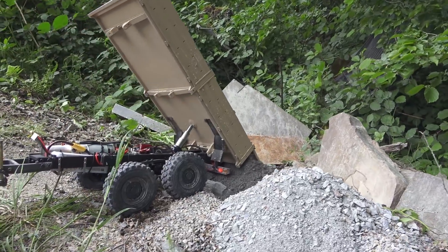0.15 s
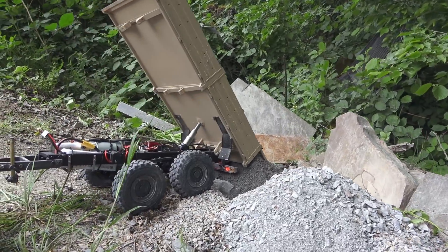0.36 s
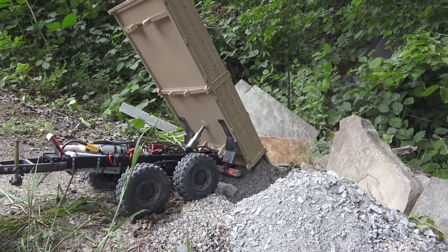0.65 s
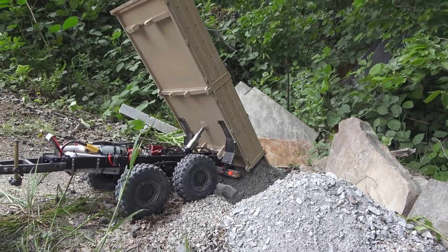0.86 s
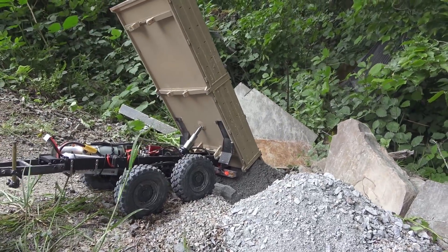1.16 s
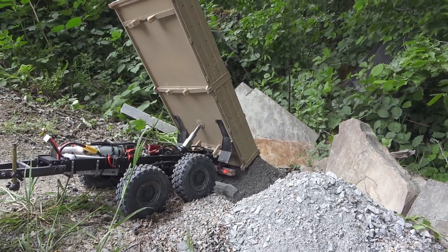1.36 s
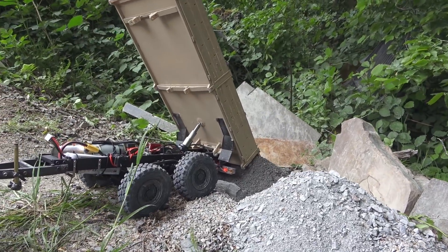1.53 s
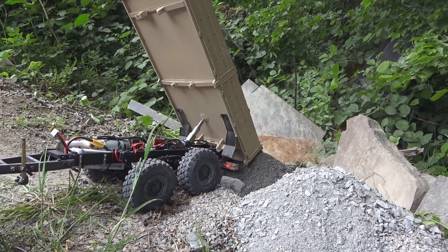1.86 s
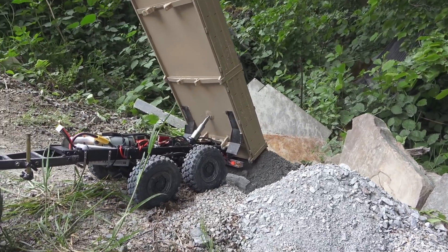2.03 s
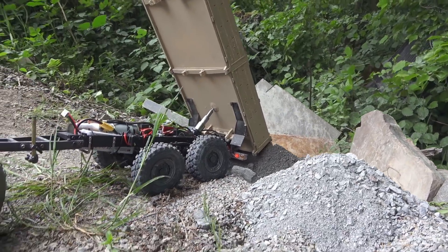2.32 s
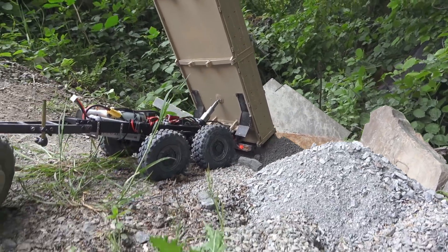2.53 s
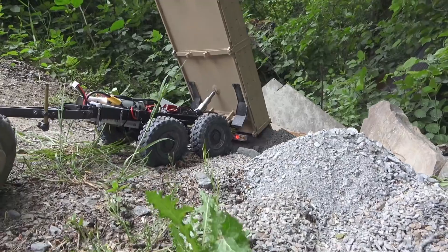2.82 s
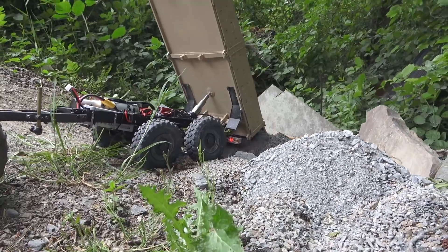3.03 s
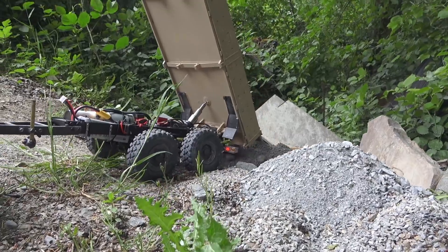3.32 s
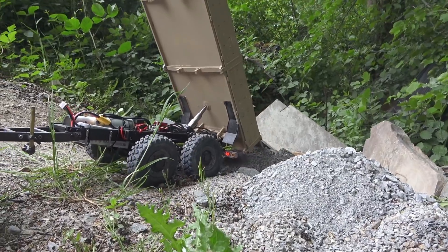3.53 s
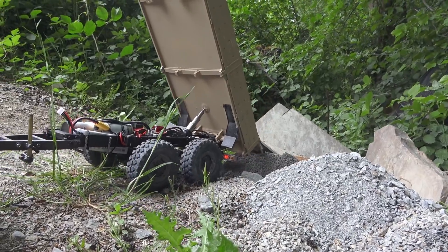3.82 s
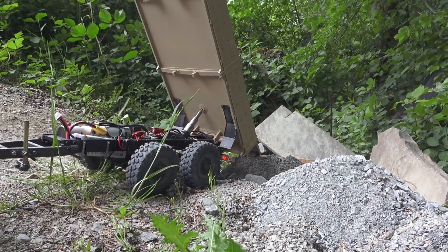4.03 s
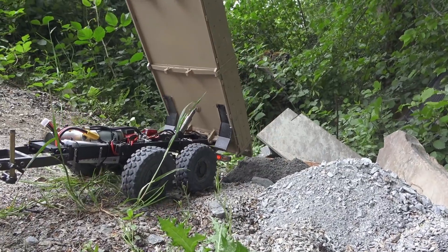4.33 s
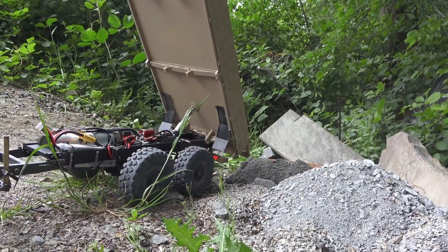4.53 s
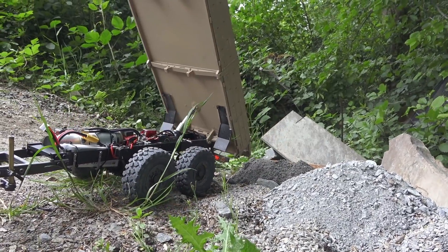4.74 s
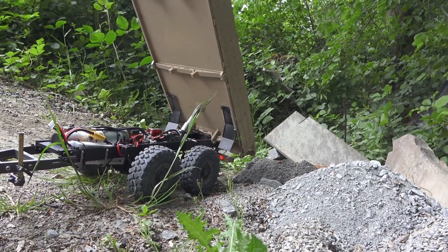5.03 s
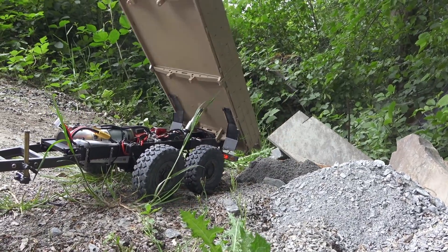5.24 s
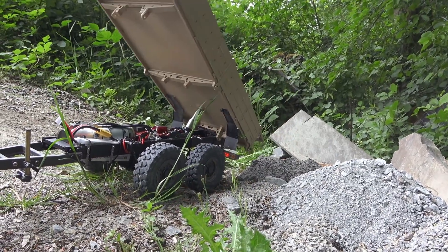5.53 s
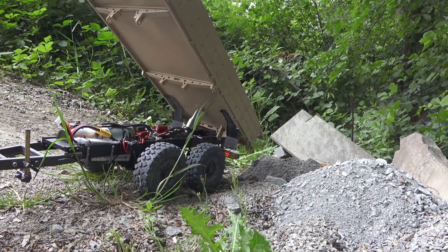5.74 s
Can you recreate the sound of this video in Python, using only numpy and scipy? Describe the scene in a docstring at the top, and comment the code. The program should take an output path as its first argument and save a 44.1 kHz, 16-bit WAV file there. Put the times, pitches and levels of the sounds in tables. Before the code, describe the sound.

Stereo microphone close by, source mainly left: hollow, grinding drivetrain noise with a fast flutter, loudest from about one to four seconds, with small stone jolts and a brief rising hum early on. Bright grit scuffs around four seconds. Then it quiets to an unsteady low moan, steady high motor singing and hiss, two servo whirrs and one clear tick. A very faint low drone lies far off.

```python
"""A model truck pulls its tipped trailer over gravel, close on the left of a stereo microphone: friction noise
of gears and tyres drives the frame's resonances, which shift with its bearing and jolt over stones. Sine tones
hum in the drawbar and moan in the chassis; band-passed noise scuffs through grit on the last pull. The pump
motor sings thin high shaft orders, nearly straight ahead, over a wide hiss; a valve servo zips twice as its
orders cross its case's modes. Noise cracks tick in the linkage; a low drone lies far off."""
import sys
import numpy as np
from scipy import signal
from scipy.fft import rfft, irfft, next_fast_len
from scipy.io import wavfile
from scipy.ndimage import uniform_filter1d, map_coordinates

SR = 44100
rng = np.random.default_rng(int(sys.argv[2]) if len(sys.argv) > 2 else 0)


def digitize_waveform(pressure):
    """Quantize a signal to 16-bit integers and store it at the path in sys.argv[1].

    Rows of a 2-D input are taken as channels; values are limited to [-1, 1].
    """
    field = np.atleast_2d(pressure).T
    bounded = np.clip(field, -1, 1)
    quanta = np.round(bounded * 32767).astype(np.int16)
    wavfile.write(sys.argv[1], SR, quanta)


N = 259300

# effort of the drive: time_s, relative level_db, middle modes over the low ones_db
EFFORT = [(0, -25, -7), (.4, -23, -8.5), (.45, -21, -10), (.55, -25, -8.5), (1.04, -19.5, -9),
          (1.15, -16, -8.5), (1.4, -16.5, -8), (1.55, -18.5, -8), (1.64, -24.5, -7.5), (1.78, -21.5, -9),
          (1.88, -27.5, -10.5), (2.04, -19, -10.5), (2.44, -19, -6), (2.55, -24.5, -3), (2.88, -17.5, -5.5),
          (3.1, -20.5, -4.5), (3.6, -25.5, -3), (3.75, -20.5, -3.5), (3.93, -20.5, -6), (4.33, -20.5, -8),
          (4.46, -25, -6.5), (4.91, -29, -6), (5.1, -28.5, -7), (5.28, -24, -8), (5.42, -27.5, -8),
          (5.5, -24, -7.5), (5.63, -28, -5), (5.72, -24.5, -6), (5.88, -27.5, -9.5)]
# the drive gear's beat: time_s, turns_per_s
GEAR_BEAT = [(0, 18.5), (.9, 19), (1.2, 24), (2.4, 24), (2.8, 19.2), (4.4, 19.2), (5, 17.5), (5.88, 17.5)]
# the truck swings to a new bearing four times: start_s and end_s in turn
SWINGS_S = [1.03, 1.13, 1.6, 2.0, 2.4, 2.75, 4.2, 4.6]
# load on the drawbar: time_s, pitch shift_hz, hum level_db (before panning)
DRAWBAR = [(0, 0, -42), (.4, -8, -37), (.85, -5, -36), (.92, 8, -27), (1.1, 30, -25), (1.22, 42, -28),
           (1.35, 0, -50), (2, -10, -50), (2.3, 30, -50), (5.88, 0, -60)]


def amp(db):
    """dB to gain."""
    return 10 ** (np.asarray(db) / 20)


def unit(x):
    """Scaled to rms 1."""
    return x / np.sqrt(np.mean(x ** 2) + 1e-20)


def along(points, hz):
    """(Hz, value) points read on a log frequency axis."""
    f, v = np.transpose(points)
    return np.interp(np.log(hz + 1), np.log(f + 1), v)


def curves(rows):
    """One value per sample for each column after the time."""
    s, *cols = np.transpose(rows)
    return [np.interp(np.arange(N) / SR, s, c) for c in cols]


def wobble(rate):
    """A smooth random curve, rate knots a second."""
    knots = rng.standard_normal(int(N * rate / SR) + 4)
    return map_coordinates(knots, [np.arange(N) * rate / SR])


def filtered(x, response):
    """x times a complex response of frequency."""
    m = next_fast_len(N + 8192)
    return irfft(rfft(x, m) * response(np.fft.rfftfreq(m, 1 / SR)), m)[..., :N]


def resonance(hz, centre_hz, width_hz):
    """One mode's complex response, 1 at its centre."""
    return 1j * hz * width_hz / (centre_hz ** 2 - hz ** 2 + 1j * hz * width_hz)


def throb(hz, depth_db, wander):
    """Gain of a regular swell at an unsteady rate."""
    return amp(depth_db * np.sin(2 * np.pi * np.cumsum(hz * (1 + wander * wobble(2.987))) / SR))


def frame():
    """Throbbing, lumpy friction noise drives frame modes whose strengths change with the bearing."""
    # frame modes: centre_hz, width_hz (before widening), relative level_db at each of five bearings,
    # right over left_db at the first three bearings, at the fourth and at the fifth
    modes = [(142, 38.5, -18, -12.5, -15, -12.5, -18.5, -7, -8.5, -10.5),
             (187.7, 47.6, -14.5, -8.5, -9.5, -5, -16, -17.5, -18.5, -34),
             (278.3, 56, -14.5, -7, -8.5, -4, -12.5, -15, -15.5, -28),
             (370.8, 40.4, -5, -6.5, -5.5, 1, -3.5, -25.5, -29, -23),
             (416, 40, -37, -9, -12, 0.5, -14.5, -22, -21.5, -13),
             (518.3, 39.8, 0, 2.5, -0.5, -38, -20.5, -23, -19, -8),
             (604, 46, -15, -2, -0.5, -10, -17.5, -24, -30, -15),
             (672.3, 50.8, -3.5, 3, 1.5, 2.5, -6, -14.5, -20, -43),
             (744, 34.3, -7.5, -0.5, 0.5, -10, -14, -21, -29, -37),
             (828, 164, -23.5, -16, -18.5, -17.5, -25, -14, -26, -31),
             (1087.5, 90, -7, -7, -5, -6, -2, -14.5, -10.5, -25),
             (1304, 98, -1.5, -4.5, -2, -1.5, -6, -16.5, -19.5, -19),
             (1464, 126, -8.5, -6, -4, 0.5, -45, -31, -41, -20),
             (1642, 102, -12.5, -12, -13, -7.5, -5, -34, -26, -31),
             (1795, 53, -26, -11, -45, 1.5, -2.5, -31, -28, -27),
             (1957, 120, -11.5, -8, -7, -22, -28, -31, -9.5, -9),
             (2362, 150, -30, -24.5, -23.5, -34, -23, -15, -8, -10),
             (2544, 85, -54, -43, -46, -24.5, -27.5, -14, -31, -17),
             (3058, 262, -24.5, -25.5, -27, -20, -25.5, -23, -22.5, -22),
             (3370, 430, -44, -54, -33, -47, -24.5, -16, -17, -24),
             (3784, 224, -32, -28.5, -29, -22, -34, -20, -21, -3),
             (4130, 190, -51, -36, -26, -44, -26.5, -33, -26, -23),
             (4740, 570, -39, -36, -34.5, -32, -30, -37, -34, -27),
             (5900, 530, -53, -47.5, -51, -46, -36, -24, -18, -22)]
    # likeness of the two capsules: frequency_hz, correlation
    likeness = [(60, .99), (200, .99), (380, .9), (640, .99), (1400, .98), (3100, .88)]
    # phase of the left capsule ahead of the right (behind it where negative): frequency_hz, phase_rad
    phase_offset = [(60, -0.5), (1400, 0.66), (1640, -3), (1980, -5.5), (2840, -6.4), (3530, -11.5)]
    # loose parts: time_s, level of the upper modes_db, independent of the effort
    loose_parts = [(0.0, -41), (0.06, -49), (0.08, -42.5), (0.77, -42), (1.46, -35.5), (1.7, -46.5),
                   (1.72, -40.5), (1.83, -48.5), (2.18, -38), (2.46, -38.5), (2.52, -44), (2.85, -37.5),
                   (2.86, -39.5), (3.26, -41), (3.65, -43.5), (3.78, -40.5), (4.31, -41.5), (4.34, -44.5),
                   (4.95, -50), (5.01, -44.5), (5.29, -47), (5.53, -43.5), (5.86, -46.5), (5.88, -42)]

    t = np.arange(N) / SR
    gear, = curves(GEAR_BEAT)
    beat = throb(2 * gear, 0.27, 0.032) * throb(gear, 1.18, 0.0406) * amp(0.46 * wobble(15))
    drive = unit(beat * amp(1.0 * wobble(150) + jolts()))

    def swung(*db):
        """Gain that moves from bearing to bearing."""
        return amp(np.interp(t, SWINGS_S, np.repeat(db, 2)[1:-1]))

    groups = np.zeros((3, 2, N))  # low, middle and upper modes
    power = np.zeros((3, N))
    for centre_hz, width_hz, *db, early, between, late in modes:
        gain = swung(*db) * np.sqrt(width_hz)  # a wide mode carries more power
        lumpy = drive * amp(0.85 * wobble(15) + 0.95 * wobble(90))
        shared, stray = lumpy * rng.standard_normal((2, N))

        def paths(f):
            """Left, right and stray: the right hears the mode shifted in phase and a little blurred."""
            like = np.clip(along(likeness, f), 0, 1)
            shifted = np.exp(-1j * along(phase_offset, f))
            skirts = resonance(f, centre_hz, 1.885 * width_hz) ** 2  # steep, so the valleys stay dark
            return skirts * [np.ones_like(f), like * shifted, np.sqrt(1 - like ** 2)]

        left, right, blur = filtered([shared, shared, stray], paths)
        if 470 < centre_hz < 560:  # the drawbar's mode shifts with the load
            bend = np.exp(2j * np.pi * np.cumsum(curves(DRAWBAR)[0]) / SR)
            analytic = signal.hilbert([left, right, blur], next_fast_len(N))[:, :N]
            left, right, blur = np.real(analytic * bend)
        right = swung(early, early, early, between, late) * (right + blur)
        g = int(centre_hz > 900) + int(centre_hz > 2200)
        groups[g] += gain * np.array([left, right]) / np.std(left)
        power[g] += gain ** 2

    # loose parts rattle hardest on the beat
    groups[2] *= unit(beat ** .9 * throb(gear, 1.2, .015) * amp(.7 * jolts()))
    level, middle = curves(EFFORT)
    upper = curves(loose_parts)[0] - level  # cancels the effort added below
    # stones under the tyres make each group's level uneven
    lumps = [0.37 * wobble(13), middle + 0.63 * wobble(13), upper + 0.11 * wobble(12)]
    sound = sum(1.75 * amp(level + db) * x / np.sqrt(p) for db, x, p in zip(lumps, groups, power))
    return filtered(notched(sound), lambda f: f ** 2 / (f ** 2 + 60 ** 2))  # low cut


def jolts():
    """A tyre drops off a stone: dB added to the drive as a sudden rise and a short decay."""
    # drops: time_s, rise_db
    drops = [(.078, 4), (.468, 4), (.613, 3), (1.215, 3), (1.925, 4), (2.172, 5), (2.751, 6), (2.795, 4),
             (3.037, 4), (3.078, 5), (3.218, 4.5), (3.261, 3), (3.855, 5), (3.903, 3), (4.22, 3),
             (4.483, 5)]
    decay_s = .016  # the rise in dB falls by 1/e
    t = np.arange(N) / SR
    return sum(db * np.exp(-np.maximum(t - s, 0) / decay_s) * (t >= s) for s, db in drops)


def notched(x):
    """Sliding notches where the ground's echo cancels the frame as the truck rolls."""
    # one curve for each gap: time_s, centre_hz, width_hz
    gaps = [
        [(0, 2660, 220), (1.05, 2660, 200), (1.4, 2720, 30), (2.7, 2770, 40), (3.1, 2950, 70), (4.3, 2870, 70),
         (4.9, 2850, 100), (5.88, 2800, 100)],
        [(0, 3550, 60), (1.2, 3470, 120), (1.7, 3450, 120), (2.1, 3500, 50), (3.2, 3500, 50), (3.7, 3450, 90),
         (4.5, 3680, 70), (5.88, 3650, 60)],
        [(0, 4000, 90), (1.1, 4150, 90), (1.9, 4320, 70), (2.45, 4450, 70), (2.55, 3970, 100), (2.8, 4300, 130),
         (3.6, 4430, 130), (3.8, 4200, 40), (5.88, 4160, 70)],
    ]
    hz, t, z = signal.stft(x, SR, nperseg=1024)
    for rows in gaps:
        s, centre, width = np.transpose(rows)
        band = resonance(hz[:, None], np.interp(t, s, centre), np.interp(t, s, width))
        z = z * np.abs(1 - .93 * band)
    return signal.istft(z, SR, nperseg=1024)[1][:, :N]


def hum():
    """A slightly unsteady sine in the drawbar's mode, which shifts in pitch and level with the load."""
    rest_hz = 515
    shift, db = curves(DRAWBAR)
    tone = np.sin(2 * np.pi * np.cumsum(rest_hz + shift + 11 * wobble(35)) / SR)
    return np.sqrt(2) * amp(db + 3.5 * wobble(25)) * tone * amp([[5], [-15]])


def moan():
    """A narrow low tone as the chassis settles, fading in as the truck slows."""
    # settling tone: time_s, pitch_hz, level_db (before panning)
    settling = [(4.4, 415.1, -32), (4.448, 423, -32), (4.486, 360.0, -38), (4.564, 401.7, -29.5),
                (5.034, 364.9, -32.5), (5.086, 385.7, -30), (5.382, 365.7, -27), (5.428, 347.6, -38),
                (5.498, 377.3, -27), (5.668, 388.6, -31), (5.762, 356, -24.5), (5.88, 394, -32.5)]
    hz, db = curves(settling)
    fade = np.clip((np.arange(N) / SR - settling[0][0]) / .12, 0, 1)
    tone = np.sin(2 * np.pi * np.cumsum(hz + 13 * wobble(30)) / SR)
    return np.sqrt(2) * fade * amp(db + 2.5 * wobble(22)) * tone * amp([[3], [-19]])


def scuff():
    """Tyres scuff through loose grit: bright, grainy band-passed noise on the left, pulsing with the gear."""
    # the last pull: start_s, end_s, fade_s, level_db (before pulsing and panning)
    last_pull = (3.8, 4.32, .07, -50)
    start, end, fade, db = last_pull
    gate = np.interp(np.arange(N) / SR, [start - fade, start, end, end + fade], [0, 1, 1, 0])
    grains = amp(2.3 * wobble(120)) * rng.standard_normal(N)
    grit = unit(filtered(grains, lambda f: resonance(f, 4800, 1700) ** 2))
    pulse = throb(2 * curves(GEAR_BEAT)[0], 1.5, .03) * amp(.7 * wobble(14))
    return amp(db) * pulse * gate * grit * amp([[5], [-11]])


def pump():
    """Shaft orders of the motor, each wavering a little on its own, over a hiss that swells with the effort."""
    # the motor, faster while the valve unloads it: time_s, turns_per_s
    shaft = [(0, 104.38), (.12, 104), (.2, 103), (.39, 102.75), (.42, 100.7), (.55, 100.45), (1.07, 100.72),
             (1.25, 100.3), (1.7, 100.34), (1.95, 100.84), (2.18, 100.56), (2.32, 99.96), (2.74, 100.28),
             (3.97, 100.3), (4.97, 100.48), (5.09, 100.8), (5.11, 103.24), (5.25, 102.7), (5.48, 102.8),
             (5.57, 101.84), (5.7, 101.42), (5.9, 101.44)]
    # lines crowding round multiples of 12 slots: multiple of the shaft, level in its group_db
    orders = [(47, -12), (48, -1), (49, -15), (52, -16), (59, -11), (60, -7), (61, -15), (62, -15),
              (64, -16), (71, -11), (72, -5), (73, -11), (74, -15), (81, -15), (83, -3), (84, -4),
              (85, -11), (86, -10), (87, -18), (95, -8), (96, -3), (97, -10), (98, -13), (99, -18),
              (105, -17), (106, -21), (107, -7), (108, -10), (109, -17), (110, -13), (111, -17), (114, -21),
              (119, -10), (120, -9), (121, -11), (122, -13), (123, -19), (129, -21), (130, -20), (131, -10),
              (132, -13), (133, -16), (134, -15), (135, -19), (142, -22), (143, -11), (144, -14),
              (145, -12), (146, -14), (147, -18), (148, -23), (153, -22), (154, -17), (155, -10),
              (156, -19)]
    # groups of lines: multiple of the slot rate, level before and after the last swing_db
    slot_groups = [(4, -60.5, -70), (5, -79, -59), (6, -67, -58.5), (7, -65, -63.5), (8, -57.5, -62),
                   (9, -55.5, -66), (10, -54, -69), (11, -59, -67), (12, -57, -70), (13, -55, -68)]
    # a group grows or fades for a while, under its multiple of the slot rate: time_s, change_db, half length_s
    swells = {4: [(.75, 6, 0.39), (2.35, -5, .2), (3.7, -5, .8), (5.8, 8, .25)], 5: [(5.7, 6, .33)],
              6: [(1.9, 8, .3), (4.3, 4, 0.23), (5.7, 3.5, .2)], 7: [(3.3, -12, .7), (4.55, 7, 0.33)],
              8: [(.6, -4, .22), (1.8, -12, 0.38), (3.1, -6, 0.17), (4.35, 9.5, 0.26), (4.88, -1, .15)],
              9: [(1.1, -5, .2), (2.1, -5, 0.54), (3.7, 2, .2)], 10: [(1.5, -8, .44), (1.9, -4, .12),
              (3.2, -11, 0.4)], 11: [(1.1, -5, .15), (1.7, 3, .2), (2.7, -9, .3), (3.1, 2, .12),
              (4.9, 6, .15)], 12: [(1.7, 3, .5), (2.65, -6, .15), (3.8, -7, .35), (4.6, 5, .3)],
              13: [(.8, -4, .4), (3.1, -4, .12)]}
    # hiss spectrum: frequency_hz, relative density_db
    hiss_spectrum = [(20, -40), (2000, -24), (4500, -8), (5500, 5), (7500, 4.5), (10000, 3), (13000, -2),
                     (16000, -5)]

    t = np.arange(N) / SR
    speed = uniform_filter1d(curves(shaft)[0], size=SR // 14)  # the rotor's inertia rounds each step
    angle = 2 * np.pi * np.cumsum(speed) / SR
    group_db = {}
    for g, *db in slot_groups:
        bumps = [change * np.exp(-((t - s) / half) ** 2) for s, change, half in swells.get(round(g), [])]
        group_db[round(g)] = np.interp(t, SWINGS_S[-2:], db) + sum(bumps)
    # neighbouring lines keep nearly in step, so a group pulses once a turn
    lines = sum(amp(db + group_db[round(k / 12)] + 2.3 * wobble(4)) * np.sin(k * angle + rng.normal(0, 1.3))
                for k, db in orders)

    # a run of shaft multiples sounds faintly: one uneven turn, repeated
    order, turn_angle = np.arange(54, 155)[:, None], np.linspace(0, 2 * np.pi, 4097)
    between = np.sin(np.pi * order / 12) ** 2
    size = amp(rng.normal(0, 4.2, order.shape) - 16 * between)  # weaker between the groups
    phase = rng.uniform(0, 2 * np.pi, order.shape)
    turn = np.sum(size * np.sin(order * turn_angle + phase), axis=0)
    faint_db = np.interp(t, SWINGS_S[-2:], [-73, -77]) + 2.0 * wobble(7)
    faint = amp(faint_db) * np.interp(angle % (2 * np.pi), turn_angle, turn)

    noise = rng.standard_normal((3, N))
    common, left, right = filtered(noise, lambda hz: amp(along(hiss_spectrum, hz)))
    hiss_db = -52.0 + 0.23 * curves(EFFORT)[0] + 0.9 * wobble(3.44)
    hiss = amp(hiss_db) * unit(common + 3.2 * np.array([left, right]))  # mostly independent: wide
    return np.sqrt(2) * (lines + faint) * amp([[.6], [-.6]]) + hiss


def servo():
    """A small motor spins up and down: rough orders ring the case's modes as they cross, with brush noise."""
    # moves: top speed at_s, top motor_hz, spin-up_s, spin-down_s, whine gain_db,
    # whine loss at standstill_db, brush gain_db
    moves = [(5.057, 868, .094, .136, -48, 10, -42), (5.548, 812, .07, .062, -50.5, 70, -48)]
    # motor orders: multiple of the motor, relative level_db
    motor_orders = [(4, 2), (5, -8), (6, 7), (7.3, -4), (9.33, 1.5), (10.6, -10), (12.4, -4)]
    # brush noise spectrum: frequency_hz, relative density_db
    brush_spectrum = [(2000, -30), (3000, -14), (3400, 2), (3900, 1), (5500, 5), (8000, 3), (11000, -1),
                      (16000, -15)]
    # case modes: centre_hz, width_hz, gain_db
    case_modes = [(3280, 150, 6), (4100, 300, -3), (4800, 380, 3), (5900, 900, -1), (7600, 700, 0),
                  (9300, 700, -1), (10600, 1200, -2)]

    def case(f):
        """The case's modes side by side."""
        return sum(amp(db) * resonance(f, c, w) for c, w, db in case_modes)

    out, t = np.zeros((2, N)), np.arange(N) / SR
    for s, top_hz, up_s, down_s, whine_db, fall_db, brush_db in moves:
        off = np.clip((t - s) / np.where(t < s, up_s, down_s), -3, 3) ** 2  # 0 at top speed, 1 at standstill
        hz = top_hz * np.maximum(1 - off, 0)
        angle = 2 * np.pi * np.cumsum(hz * (1 + .014 * wobble(400))) / SR
        whine = sum(amp(db + 2.6 * wobble(140)) * np.sin(k * angle) for k, db in motor_orders)
        whine = filtered(amp(whine_db - fall_db * off) * whine, case)
        brush = unit(filtered(rng.standard_normal((2, N)), lambda f: amp(along(brush_spectrum, f))))
        bright = filtered(brush, lambda f: 1 / (1 + (8000 / (f + 1)) ** 4))
        brush += bright * ((hz / 885) ** 4 - 1)  # the treble comes only at speed
        brush_gain = amp(brush_db - 8 * off ** 2 + 1.1 * wobble(180))  # 8 dB down at standstill
        out += whine * amp([[5], [-14]]) + brush_gain * brush * amp([[3], [-3.5]])
    return out


def ticks():
    """Short bright cracks from the linkage: decaying noise through one broad band."""
    # cracks: time_s, noise gain at onset_db (before filter and panning)
    cracks = [(2.372, -46), (3.998, -41), (4.232, -43), (5.4231, -35)]
    out, t = np.zeros(N), np.arange(SR // 20) / SR
    for s, db in cracks:
        decay = amp(db - 60 * t / .025)  # 60 dB in 25 ms
        out[round(s * SR):][:len(t)] += decay * rng.standard_normal(len(t))
    return filtered(out, lambda f: resonance(f, 6500, 6500) ** 2) * amp([[4], [-8]])


def drone():
    """A faint low drone from far away: filtered noise that dies down, alike at both capsules."""
    # drone spectrum: frequency_hz, relative density_db
    rumble = [(20, 6), (40, -6), (60, 8), (90, 3), (140, -29)]
    level_db = np.interp(np.arange(N) / SR, [0, 1.2, 5.8], [-59, -59, -67])
    noise = unit(filtered(rng.standard_normal(N), lambda hz: amp(along(rumble, hz))))
    return amp(level_db + 0.54 * wobble(3)) * noise


def scene():
    """All sources at the two capsules."""
    return frame() + hum() + moan() + scuff() + pump() + servo() + ticks() + drone()


def record(dry):
    """Loud peaks are squeezed softly; nothing passes above the band limit."""
    top_hz = 15750
    squeezed = dry / (1 + np.abs(dry) ** 6) ** (1 / 6)
    return filtered(squeezed, lambda hz: hz < top_hz)


dry = scene()
out = record(dry)
digitize_waveform(out)
```